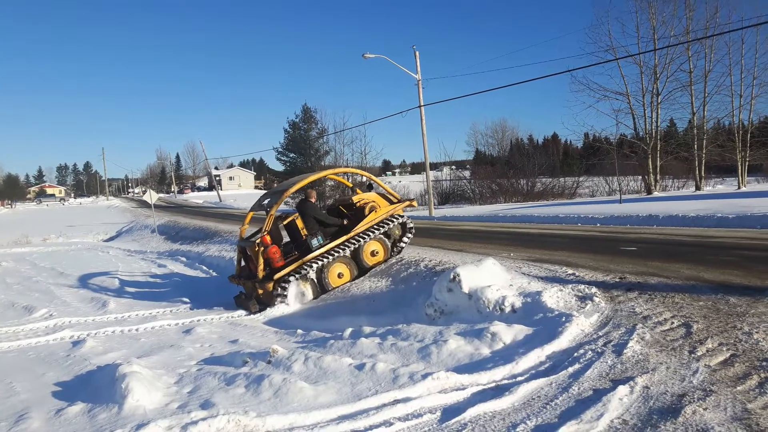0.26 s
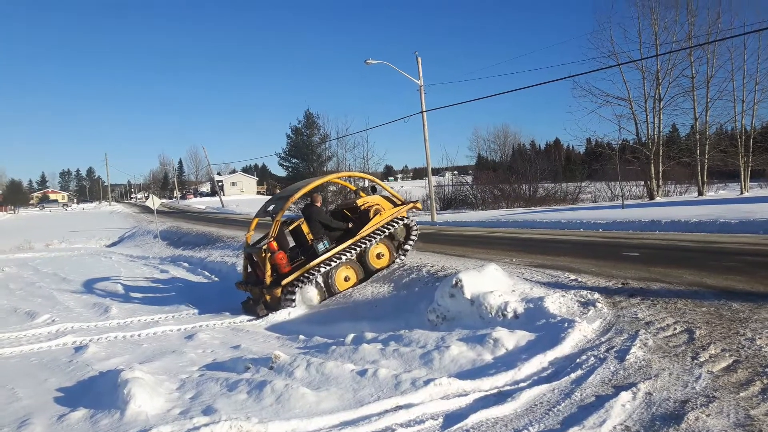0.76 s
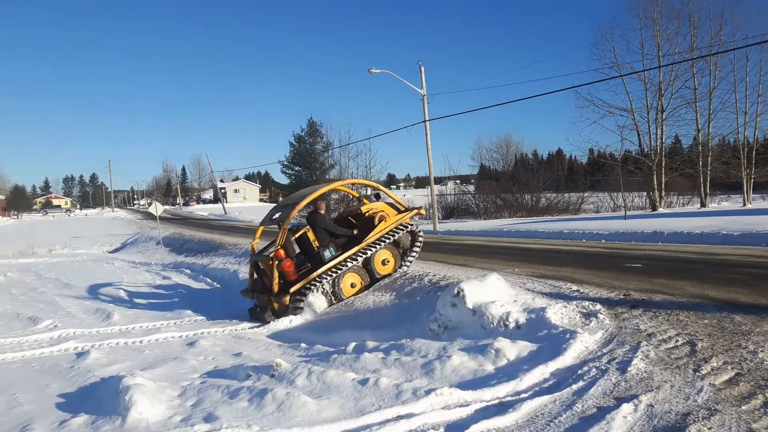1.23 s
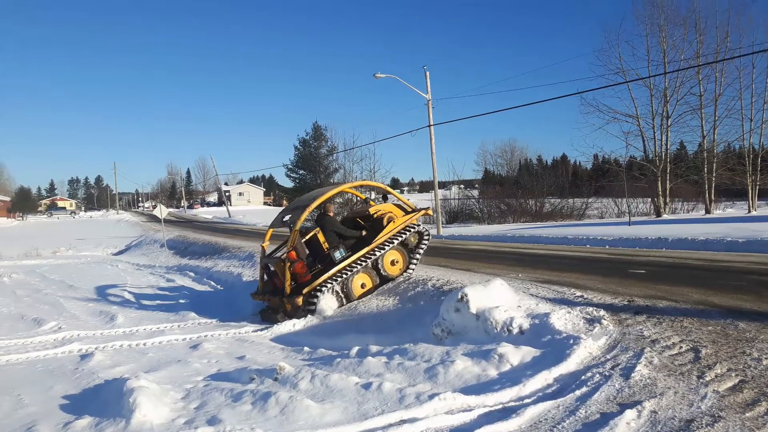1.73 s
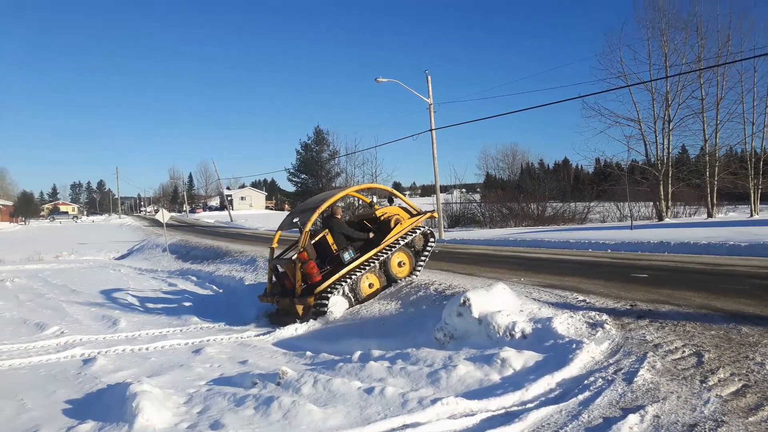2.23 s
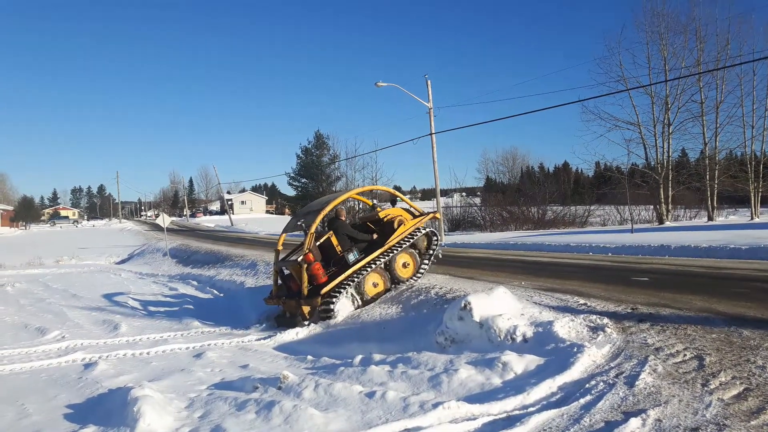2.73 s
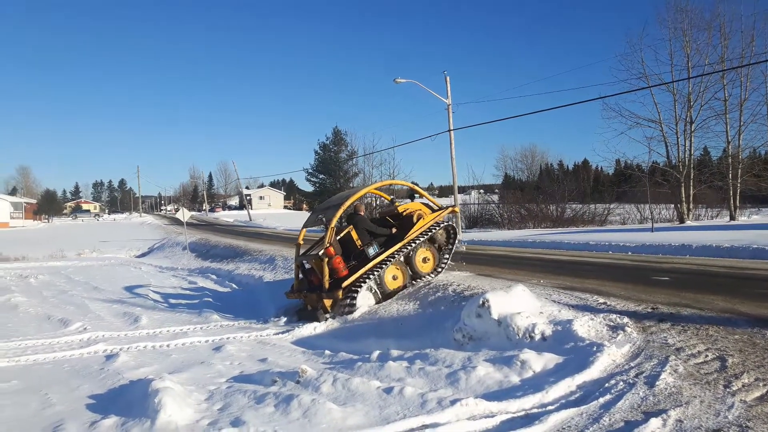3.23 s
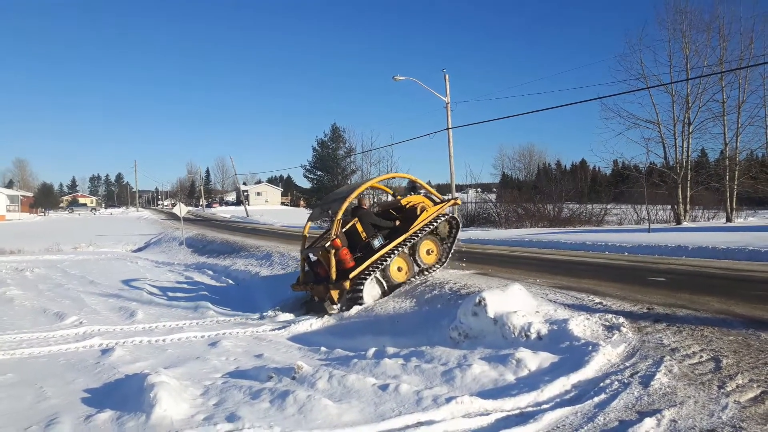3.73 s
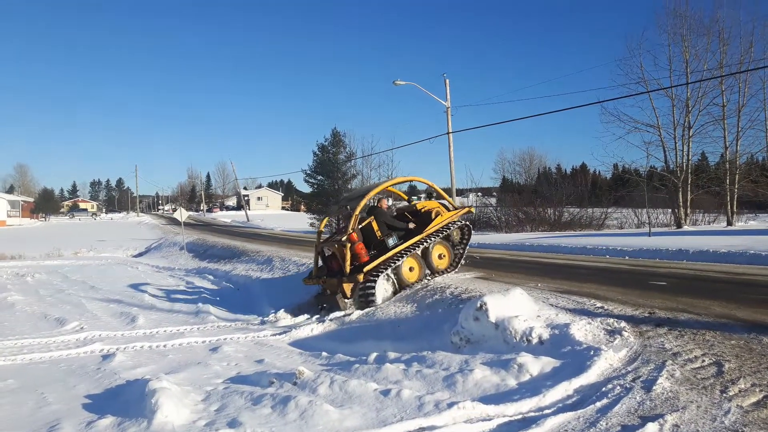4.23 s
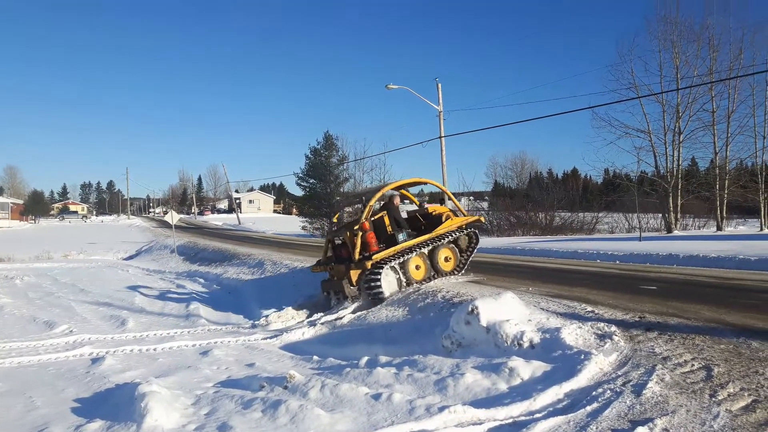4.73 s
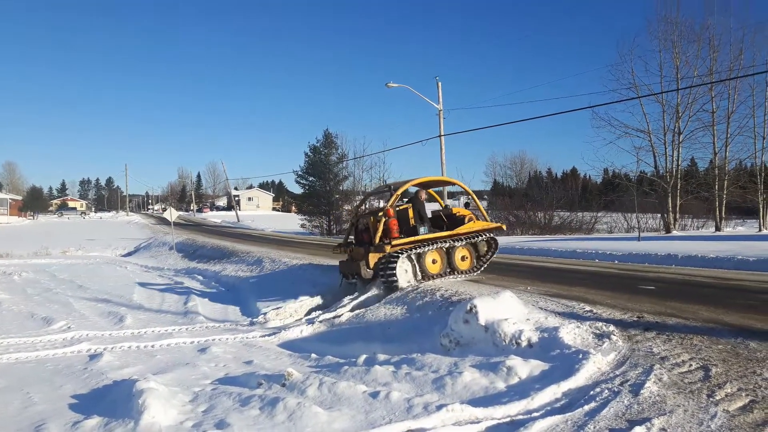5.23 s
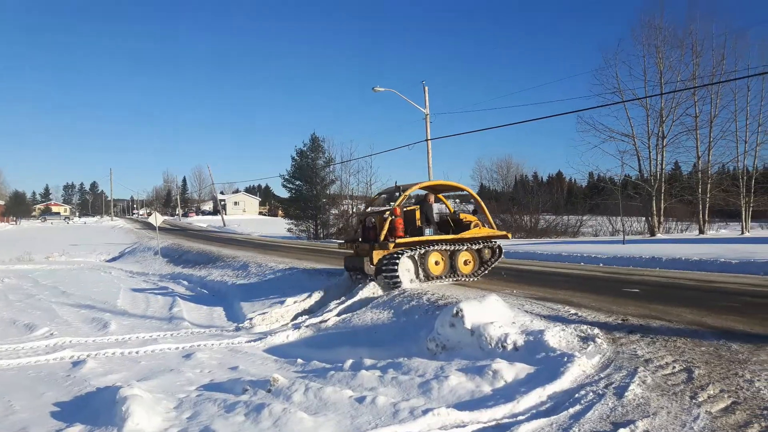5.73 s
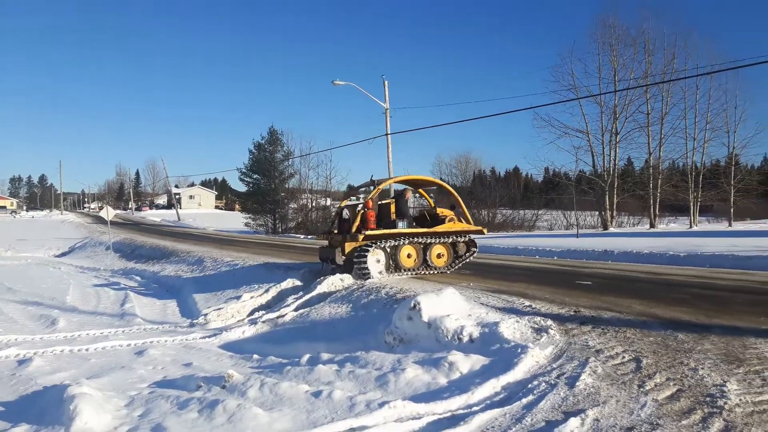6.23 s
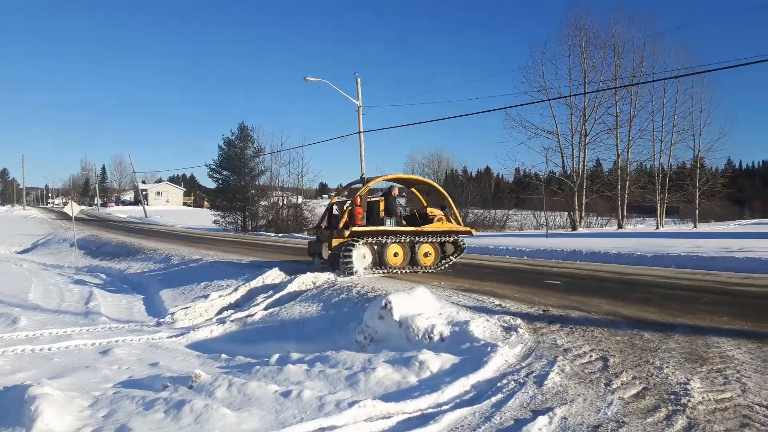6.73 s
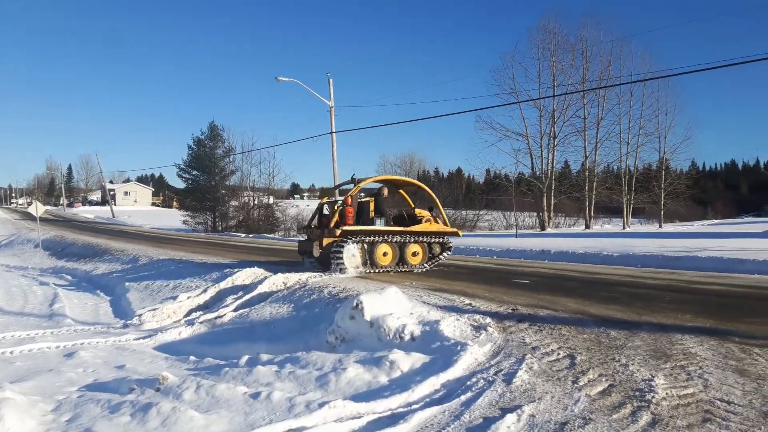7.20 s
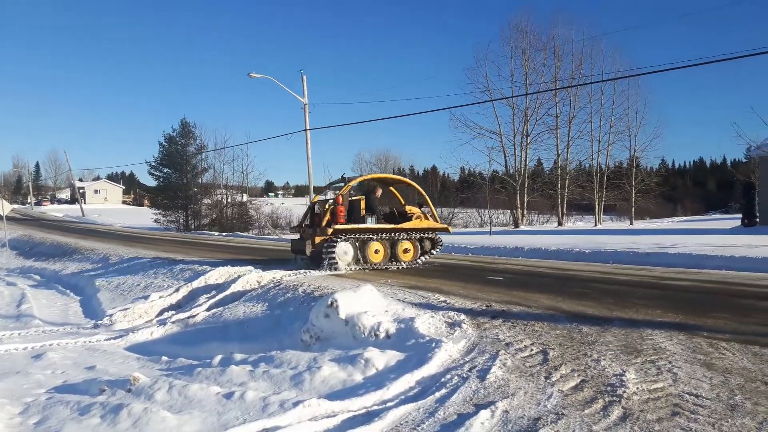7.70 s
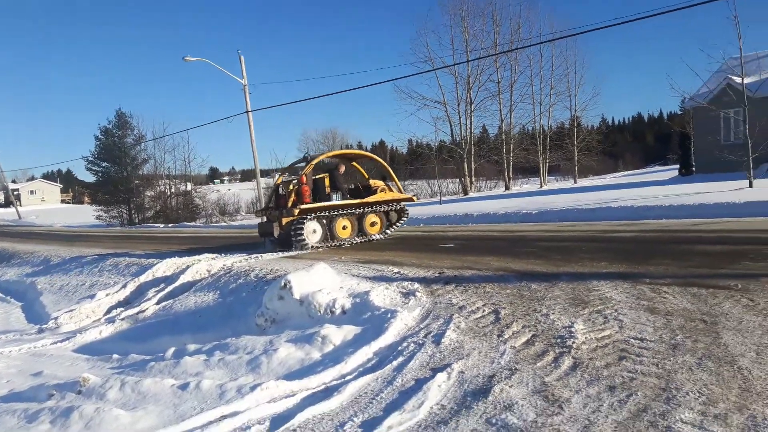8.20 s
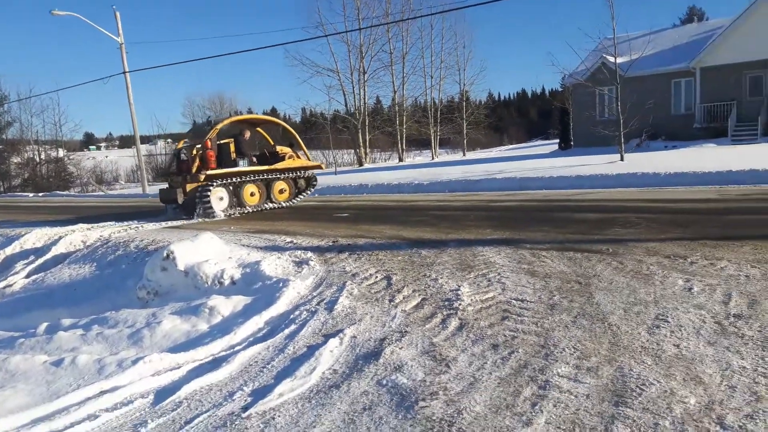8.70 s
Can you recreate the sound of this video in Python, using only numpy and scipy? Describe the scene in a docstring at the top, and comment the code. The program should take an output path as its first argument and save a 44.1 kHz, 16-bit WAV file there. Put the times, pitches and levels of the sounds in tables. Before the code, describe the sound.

Outdoors in the open, a small four-cylinder engine runs throughout, some metres from the microphone. From 0 s it chugs at a fast idle, about 14 uneven cycles a second, with a low exhaust drone, thumps, rough casing roar, faint whine, knocking valves and bright puffs of gas. From about 1 to 2 s the speed sags slightly; the highest hiss grows clearer after 2 s. The drone gradually weakens from 3 to 5 s as the machine climbs. Around 5.6 s it tips over the bank, the engine briefly races a little, and its loud side swings away: hiss and knocks drop and smooth out. From 6 to 9 s it chugs on, softer and duller, with the drone partly returning near 7.3 s. A few faint ticks fall around 7.5 to 7.7 s; low wind rumble and short bumps touch the microphone from about 8.2 s to the end.

```python
"""A small four-cylinder engine on a tracked snow vehicle chugs at a fast idle, some metres away.
Its exhaust pipe drones on multiples of the engine cycle, and each firing adds a thump and a puff of hiss.
The casing roars and whines, valves knock in every cycle, and a few faint ticks come near the end.
The vehicle tips over a snow bank onto the road, turns its loud side away and recedes.
Near the end, low wind noise and short bumps reach the microphone."""
import sys
import numpy as np
from scipy import signal
from scipy.fft import rfft, irfft
from scipy.io import wavfile
from scipy.ndimage import uniform_filter1d

SR = 44100
rng = np.random.default_rng(int(sys.argv[2]) if len(sys.argv) > 2 else 0)


def unload_audio(sound):
    """Save the sound as a 16-bit wav file, at the path given as the first command line argument."""
    columns = np.transpose(np.atleast_2d(sound))
    # keep every value between -1 and 1, then stretch to whole-number steps
    steps = np.round(np.clip(columns, -1, 1) * 32767)
    wavfile.write(sys.argv[1], SR, steps.astype(np.int16))


N = 394694  # length in samples, about 8.95 s

# Firing of each cylinder, one a row; levels are relative, "facing" and "away" tell which side is heard:
# place [part of a cycle], thump_db, puff_facing_db, puff_away_db, upper_puff_db, top_facing_db, top_away_db
CYLINDERS = [(0.198, -1, -3, 0, -1.5, -3, 0), (0.447, 8, 5.5, -21, -0.5, 4, -19),
             (0.699, 3, 2, -3, -3, 0, -1), (0.951, -1, -14.5, -12, -20, -10, 5)]
# Engine speed, sagging on the climb and racing over the crest: time_s, speed [four-stroke cycles per s]
ENGINE_SPEED = [(0.0, 14.203), (0.9, 14.048), (1.35, 13.584), (2.0, 13.63), (3.6, 13.741), (4.4, 13.947),
                (5.0, 13.932), (5.6, 14.417), (6.2, 14.133), (6.9, 13.973), (7.7, 14.021), (8.95, 13.85)]


def exhaust(drone_db, hum_db, away):
    """The pipe drones on clean multiples of the cycle; each firing adds an uneven thump."""
    # Resonances of the pipe: pitch_hz, width_hz, level_db (relative)
    pipe_modes = [(113, 53, 5.5), (184, 54, -7), (247, 61, 1), (301, 18, -2)]
    # Three groups of drone tones: multiple [of the cycle rate], facing_db, away_db (relative)
    drone_groups = [
        [(5, -7, -14), (6, -13, -33), (7, -7, -8), (8, -11, 0)],
        [(9, -0.5, -13), (10, -2.5, -38), (12, -15.5, -1), (19, -14.5, -35)],
        [(13, -33, -3), (14, -25, -10), (15, -16.5, -7), (16, -9.5, -17.), (17, -20, -21)],
    ]
    crests = 0.82, 0.785, 0.68  # where in the cycle each group peaks

    place, thump_db = np.transpose(CYLINDERS)[:2]
    firings = strikes(place + 0.035, thump_db, spread_db=1.7, jitter_s=0.00025)
    thump = -evened(ring(firings, pipe_modes))
    drone = 0
    for group, crest in zip(drone_groups, crests):
        drone = drone + tones(group, away, crest, waver_db=1.8)
    # Four cylinders fire once a cycle, so the hum is at the firing rate
    hum = amp(hum_db) * tones([(4, 0, 0)], 0, crests[0], waver_db=0.5)
    pipe = pipe_gain(drone_db, away) * tones([(11, 0, 0)], 0, crests[1], waver_db=0.54)
    return amp(drone_db - 7.0) * drone + amp(drone_db - 12.5) * thump + hum + pipe


def pipe_gain(drone_db, away):
    """Gain of the eleventh multiple, which blooms when it meets a narrow pipe resonance at low speed."""
    resonance_hz, half_width_hz, resonance_db = 150, 1.4, -53.5
    off_pipe_db, off_pipe_away_db = -18, 10.5  # level elsewhere against the drone setting; rise when away
    detune = (11 * curves(ENGINE_SPEED)[0] - resonance_hz) / half_width_hz
    elsewhere = amp(drone_db + off_pipe_db + off_pipe_away_db * away)
    return amp(resonance_db) / (1 + detune ** 2) + elsewhere


def casing(roar_db, away):
    """Wide mechanical roar, a whine of turning parts, and hollow panels jolted in every cycle."""
    # Jolts to the panels: place [part of a cycle], level_db (relative)
    jolts = [(.01, -.5), (.31, -6.), (.59, -6.), (.74, -5.)]
    # Resonances of the panels: pitch_hz, width_hz, level_db (relative)
    panel_modes = [(500, 37, -7.5), (537, 76, 0.5), (600, 97, 0)]
    # Colour of the roar: pitch_hz, level_db [per Hz, relative]
    roar_colour = [(26, -43), (45, -14), (118, -4.5), (254, -13), (366, -38), (447, 2), (478, 4.5),
                   (574, -1.5), (736, -35), (945, -7), (1080, -14.5), (1390, -10), (1870, -12), (2070, -18),
                   (2400, -27.5), (3120, -62), (5280, -120)]
    # Whine of turning parts: multiple [of the cycle rate], facing_db, away_db (relative)
    whine_tones = [(32, -17., -20.), (33, -19., -17.), (34, -7., -10.), (36, -16., -14.), (37, -12., -14.),
                   (38, -18., -16.), (41, -12., -15.)]

    place, jolt_db = np.transpose(jolts)
    blows = strikes(place, jolt_db, spread_db=1.03, jitter_s=0.00045)
    # Each jolt hits the panels and briefly swells a steady hiss that also rings them
    swell = 0.28 + gate(blows, rise_s=0.0023, hold_s=0.0043, fall_s=0.0035)
    shaken = swell * rng.standard_normal(N) + 5.0 * blows
    panels = amp(-5.5) * evened(ring(shaken, panel_modes))
    roar = amp(-1.5) * noise(roar_colour)
    whine = tones(whine_tones, away, 0.04, waver_db=2.1)
    return amp(roar_db) * (panels + roar + whine)


def valves(low_db, knock_db, away):
    """Knocks ring the close modes of the cover, which beat; a short rattle follows each knock."""
    # Knocks in each cycle: place [part of a cycle], cover_db, low_cover_db, rattle_db (relative)
    knocks = [(.192, -.5, -9., -6.), (.31, -4., -12., -10.), (.447, -3.5, -.5, -1.), (.565, -10., -8., -8.),
              (.7, -20., -10., -12.)]
    # Three tables of cover resonances: pitch_hz, width_hz, level_db (relative)
    close_modes = [(1173, 52, -.5), (1287, 52, -2.), (1406, 52, -1.5)]
    wide_modes = [(1596, 237, 4.5), (1824, 162, 1.5), (2010, 106, -17), (2660, 93, -13.5)]
    low_modes = [(996, 89, 4), (1077, 110, 8)]

    place, *levels = np.transpose(knocks)
    blows, low_blows, shakes = (strikes(place, db, spread_db=1.2, jitter_s=0.0002) for db in levels)
    swell = gate(shakes, rise_s=0.003, hold_s=0.003, fall_s=0.007)
    rattle = (0.005 + 0.016 * away + 0.026 * swell) * rng.standard_normal(N)
    close = ring(blows, close_modes, swell_s=0.0028) + ring(rattle, close_modes)
    wide = ring(0.23 * blows, wide_modes, swell_s=0.00188) + 1.36 * ring(rattle, wide_modes)
    low = ring(0.5 * low_blows + 1.2 * rattle, low_modes, swell_s=0.002033)
    return amp(low_db - 10.0) * levelled(low) + amp(knock_db - 1.0) * levelled(close + wide)


def leak(puff_db, upper_db, top_low_db, top_high_db, away):
    """Gas spits out at each firing; which cylinder is loudest depends on the side facing the listener."""
    # Colours of the puff, its upper band and two bands of top hiss: pitch_hz, level_db [per Hz, relative]
    puff_colour = [(1290, -19), (2200, -10.5), (2310, -12), (2650, -9), (3010, -10.5), (3520, -20),
                   (3980, -15), (4320, -2), (5160, 3.5), (5400, -1.5), (6500, -28.5), (8450, -61),
                   (14300, -120)]
    upper_colour = [(6300, -21), (7000, -6), (7900, -1.5), (8700, -7.5), (9500, -17.5), (10500, -15.5)]
    top_low_colour = [(9500, -18.5), (11000, -9.5), (12300, -2), (13300, -5.5), (14200, -15)]
    top_high_colour = [(12500, -26), (13500, -11), (14500, -7), (15300, -8), (15900, -13)]

    place, _, *levels = np.transpose(CYLINDERS)
    puff, puff_away, upper, top, top_away = (
        gate(strikes(place - 0.012, db, spread_db=1.4, jitter_s=0.0004), rise_s=0.005, hold_s=0.005, fall_s=0.005)
        for db in levels)
    # The jet tears within each puff: a fast, slight flutter of the level
    sputter = amp(0.44 * evened(uniform_filter1d(rng.standard_normal(N), 40)))
    # Each envelope has a steady part under its puffs
    mid = (1 - away) * (0.12 + puff * sputter) + away * (1.27 + puff_away)
    bright = 0.12 + 1.0 * away + upper * sputter
    high = (1 - away) * (0.2 + top * sputter) + away * (0.55 + top_away)
    mid_hiss = amp(puff_db) * levelled(mid) * noise(puff_colour)
    upper_hiss = amp(upper_db) * levelled(bright) * noise(upper_colour)
    fizz = amp(top_low_db) * noise(top_low_colour) + amp(top_high_db) * noise(top_high_colour)
    return mid_hiss + upper_hiss + levelled(high) * fizz


def grit():
    """Short bright ticks of noise that start at once and die away evenly in decibels."""
    # Faint ticks, perhaps grit under the tracks: start_s, level_db, fade_s [time to fall 60 dB]
    ticks = [(7.461, -58., .015), (7.506, -50., .02), (7.685, -61., .015)]
    t, envelope = np.arange(N) / SR, 0
    for start_s, level_db, fade_s in ticks:
        envelope = envelope + (t > start_s) * amp(level_db - 60 * abs(t - start_s) / fade_s)
    # Pitch in Hz, relative level in dB per Hz
    colour = [(3500, -20), (5600, 0), (7000, -22), (9500, -26), (13000, -15), (15900, -16)]
    return envelope * noise(colour)


def wind():
    """Low rumbling noise, and single gust bumps on the microphone as short swells of a low tone."""
    # Wind rumble: time_s, level_db
    rumble_level = [(7.6, -78), (8., -64), (8.35, -50), (8.6, -55), (8.95, -51)]
    # Gust bumps: middle_s, level_db, pitch_hz, half_length_s
    bumps = [(8.181, -36, 436, 0.0057), (8.312, -34, 334, 0.0046), (8.3665, -31, 149, 0.002),
             (8.382, -38, 75, 0.01), (8.403, -26, 142, 0.0012), (8.555, -34.5, 140, 0.0064),
             (8.575, -38, 130, 0.0045), (8.655, -34, 142, 0.0049), (8.744, -30.5, 394, 0.0017),
             (8.907, -34, 130, .004)]
    # Colour of the rumble: pitch in Hz, relative level in dB per Hz
    rumble = noise([(40, -14.0), (80, -1.0), (170, 5.0), (400, -15.0)])
    out = amp(curves(rumble_level)[0]) * rumble
    for middle_s, level_db, pitch_hz, half_length_s in bumps:
        t = np.arange(N) / SR - middle_s
        swell = np.exp(-(t / half_length_s) ** 2)
        out = out + amp(level_db) * swell * np.sin(2 * np.pi * pitch_hz * t)
    return out


def crank():
    """Four-stroke cycles completed, sample by sample: the engine speed added up over time."""
    return np.cumsum(curves(ENGINE_SPEED)[0]) / SR


def strikes(place, db, spread_db, jitter_s):
    """One impulse at each place in every engine cycle, each a little different in size and moment."""
    s, cycles = np.arange(N) / SR, crank()
    at = (np.arange(int(cycles[-1]) + 1)[:, None] + place).ravel()
    size, shift = rng.standard_normal((len(at), 2)).T
    # Strikes beyond the last cycle get size zero
    size = amp(np.resize(db, len(at)) + spread_db * size) * (at < cycles[-1])
    moment_s = np.interp(at, cycles, s) + jitter_s * shift
    sample = np.clip(moment_s * SR, 0, N - 1).astype(int)
    return np.bincount(sample, size, N)


def tones(rows, away, place, waver_db):
    """Multiples of the cycle rate that crest together at one place in the cycle, each wavering slowly."""
    cycles, out = crank() - place, 0
    for multiple, facing_db, away_db in rows:
        # A new random level about every 0.3 s, joined by straight lines
        waver = np.interp(np.arange(N), np.linspace(0, N, num=30), rng.standard_normal(30))
        level_db = facing_db + away * (away_db - facing_db) + waver_db * waver
        out = out + amp(level_db) * np.cos(2 * np.pi * multiple * cycles)
    return np.sqrt(2) * out


def ring(x, modes, swell_s=1 / SR):
    """Passes x through decaying modes that build up over swell_s and are in step at its end."""
    t, body = np.arange(SR // 8) / SR, 0
    for pitch_hz, width_hz, level_db in modes:
        decay = np.exp(-np.pi * width_hz * t)  # a wider resonance dies sooner
        body = body + amp(level_db) * decay * np.sin(2 * np.pi * pitch_hz * (t - swell_s))
    return signal.oaconvolve(x, np.minimum(t / swell_s, 1) ** 2 * body)[:N]


def gate(x, rise_s, hold_s, fall_s):
    """Turns impulses into envelopes that swell, hold until hold_s after the strike and die away."""
    t = np.arange(SR // 10) / SR
    rise = np.sin(np.pi / 2 * np.minimum(t / rise_s, 1)) ** 2
    fall = np.exp(-np.maximum(t - hold_s, 0) / fall_s)
    return signal.oaconvolve(x, rise * fall)[:N]


def noise(colour):
    """Random noise shaped to a colour, pitch in Hz against level in dB, then scaled to rms 1."""
    hz = np.fft.rfftfreq(N, 1 / SR) + 1  # the 1 avoids log of zero
    pitch_hz, level_db = np.transpose(colour)
    gain = amp(np.interp(np.log(hz), np.log(pitch_hz), level_db, -90, -90))
    return evened(irfft(rfft(rng.standard_normal(N)) * gain, N))


def amp(db):
    """Decibels to gain."""
    return 10 ** (np.asarray(db) / 20)


def evened(x):
    """Scales to rms 1."""
    return x / np.sqrt(np.mean(x ** 2) + 1e-20)


def levelled(x):
    """Keeps the throb of each cycle and levels the slow mean, taken over half a second."""
    return x / np.sqrt(uniform_filter1d(x ** 2, SR // 2))


def curves(rows):
    """Every column of a table after the time column, drawn as straight lines sample by sample."""
    s, *columns = np.transpose(rows)
    return [np.interp(np.arange(N) / SR, s, column) for column in columns]


def step(s, length_s):
    """A smooth passage from 0 to 1 around one moment."""
    return 0.5 + 0.5 * np.tanh((np.arange(N) / SR - s) / (2 * length_s))


def scene():
    """Adds engine, ticks and wind at one microphone as the vehicle turns and recedes."""
    # The drive: time_s, loss_db [as the vehicle turns and recedes], treble_lift_db, drone_db [setting]
    drive = [(0, 0, 0.5, -42.5), (.9, -0.5, -2, -43.5), (1.8, 0, 0, -44.5), (2.25, 0.5, 3.5, -45),
             (3.15, 1, 2.5, -45.5), (4.05, .5, -0.5, -48), (4.95, -2.5, 3, -50), (5.85, -6.5, -1, -52.5),
             (6.75, -8, -0.5, -51), (7.3, -10, 0.5, -46.5), (8.1, -10, -1.5, -47), (8.95, -10, -4, -47.5)]
    # Two bands: time_s, casing_roar_db [setting], hiss_above_13_khz_db
    bands = [(0, -43.5, -65), (1.8, -44.5, -62), (2.25, -44, -56.5), (4.95, -42, -55.5), (6.3, -44, -61.5),
             (7.2, -45, -63), (8.1, -46, -70), (8.55, -46.5, -78), (8.95, -48.5, -81)]
    # Puff hiss, its upper band, top hiss below 13 kHz: base_db, loss_share, lift_share [parts of the drive]
    hiss = [(-48, 0.99, 0.33), (-65, 1.22, 1), (-62.5, 0.8, 0.72)]
    tip_s, tip_length_s = 5.57, 0.22  # the loud side swings away over the bank
    facing, turned = 0.14, 0.72  # how far it is away before and after, on a scale of 0 to 1

    loss_db, lift_db, drone_db = curves(drive)
    roar_db, top_db = curves(bands)
    away = facing + (turned - facing) * step(tip_s, tip_length_s)
    hum_db = -55 - 10 * step(5.2, tip_length_s)
    # The low cover mode swings with the drone, but wider
    low_db = -44.5 + 1.7 * (drone_db + 45) + 0.47 * loss_db
    knock_db = -42 + loss_db
    hiss_db = [db + loss_share * loss_db + lift_share * lift_db for db, loss_share, lift_share in hiss]

    engine = exhaust(drone_db, hum_db, away) + casing(roar_db, away) + valves(low_db, knock_db, away)
    puffs = leak(*hiss_db, top_db, away)
    return (engine + puffs + grit() + wind())[None]


def record(dry):
    """Fixed hollows in the response at the microphone, its bass cut, then the band limit."""
    # Hollows: pitch_hz, half_width_hz, depth_db
    hollows = [(742, 69, -8.5), (2310, 134, -6.5), (3506, 235, -11.5), (4074, 54, -14), (6600, 110, -10)]
    edge_hz = 15780
    hz = np.fft.rfftfreq(N, 1 / SR)
    response_db = sum(db * np.exp(-((hz - pitch) / width) ** 2) for pitch, width, db in hollows)
    hollow = irfft(rfft(dry) * amp(response_db), N)
    thin = signal.sosfilt(signal.butter(4, 48, "high", fs=SR, output="sos"), hollow)
    band_limit = signal.firwin(511, edge_hz, window=("kaiser", 9), fs=SR)
    return signal.oaconvolve(thin, band_limit[None], "same")


dry = scene()
out = record(dry)
unload_audio(out)
```